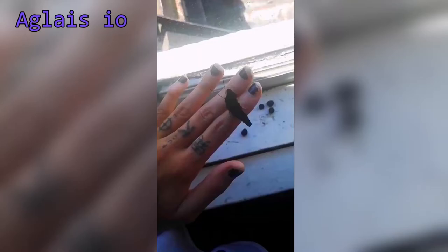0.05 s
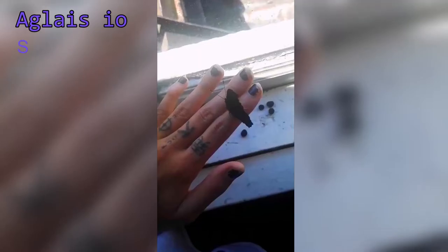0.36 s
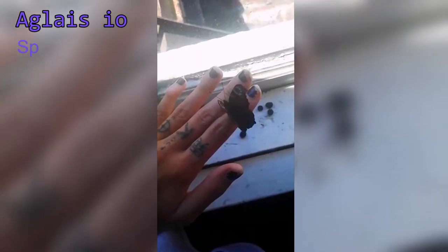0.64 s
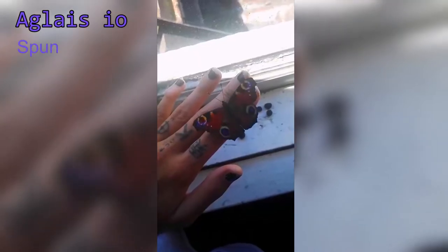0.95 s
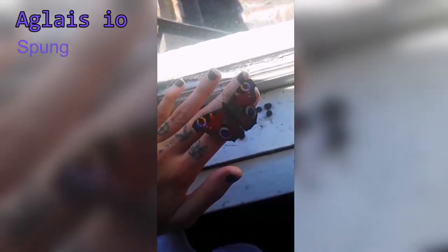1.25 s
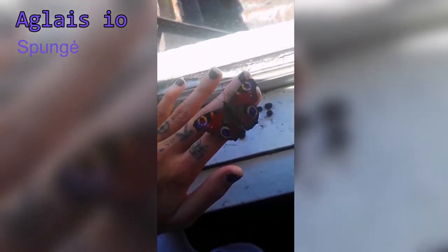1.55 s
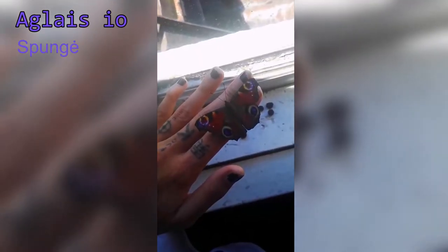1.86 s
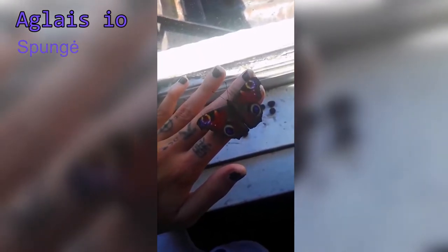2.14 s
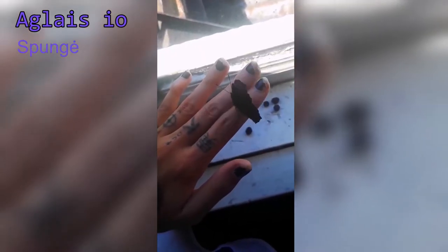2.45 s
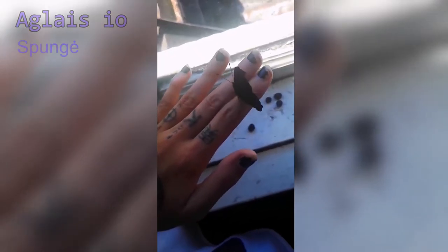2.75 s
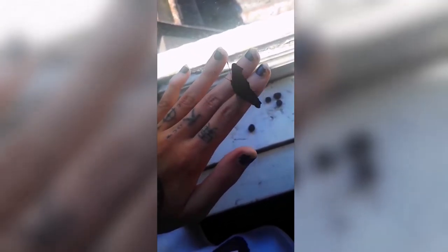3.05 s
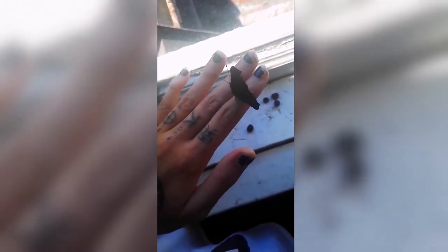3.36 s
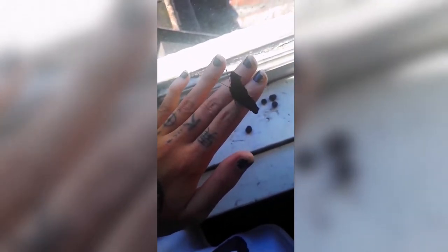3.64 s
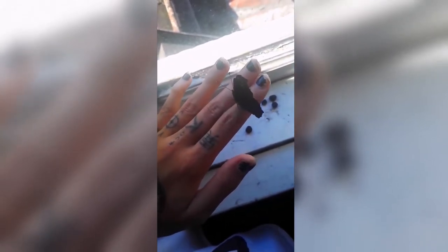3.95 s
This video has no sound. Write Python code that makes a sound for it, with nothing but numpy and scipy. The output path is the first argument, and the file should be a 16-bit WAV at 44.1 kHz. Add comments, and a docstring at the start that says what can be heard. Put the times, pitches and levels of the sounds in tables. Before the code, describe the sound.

Butterfly wings rustle faintly and close by in a quiet room. Steady hiss fades in by 0.5 seconds, with low rumble, faint electrical hum and a thin whine. Five tiny dry ticks fall between 0.5 and 1.7 seconds, and a soft high swish passes on the right around 1.8. A brief, louder rasp with a hollow ring comes at 3.4. Faint dull bumps occur near 0.9, 2.3 and 3.2 seconds.

```python
"""Tiny, dry rustles, perhaps the wings of a butterfly sitting on a hand, sound close by in a quiet room.
Each is stick-slip friction, a train of tiny catches: five high ticks, then one longer rasp with a
hollow, ringing body. A soft high swish passes on the right. Behind them the room fades in: even hiss,
brighter at the right microphone port, a low rumble, a faint mains hum, a thin whine and a few dull bumps."""
import sys
import numpy as np
from scipy import signal
from scipy.fft import rfft, irfft, next_fast_len
from scipy.io import wavfile
from scipy.ndimage import map_coordinates

SR = 44100
rng = np.random.default_rng(int(sys.argv[2]) if len(sys.argv) > 2 else 0)


def bounce(signal):
    """Save signal as a 16-bit WAV file at the path given by the first command-line argument."""
    frames = np.transpose(np.atleast_2d(signal))
    limited = np.clip(frames, -1, 1)
    pcm = np.round(limited * 32767).astype(np.int16)
    wavfile.write(sys.argv[1], SR, pcm)


N = 176400
TOP_HZ, NOISE_TOP_HZ = 15600, 14330  # upper band edges of the whole sound and of the steady noises

# Short rubs. Each row: centre in seconds, level in dB, half length in seconds,
# left minus right in dB, scuff relative to the level in dB.
WING_RUBS = [(0.452, -34.3, 0.0036, 6, -10), (0.669, -33.8, 0.0036, 4.5, -7.5),
             (0.884, -29.5, 0.0032, 2, -18), (1.316, -32.5, 0.0032, 4, -8), (1.712, -41, 0.006, 0, -5)]
# Snags within the rasp. Each row: centre in seconds, boost in dB.
RASP_SNAGS = [(3.380, 5.5), (3.3884, 6), (3.3965, 2.5), (3.407, 4.5), (3.416, 2)]
# Spectra of the rubs and the swish. Each row: frequency in Hz, relative spectral density in dB.
TICK_SPECTRUM = [(500, -40), (3000, -26), (7200, -20), (8200, -7.5), (9200, -10.5), (10300, -2.5),
                 (12200, 1), (13600, 4), (14300, -4), (15300, -28)]
SCUFF_SPECTRUM = [(500, -29), (3000, -10), (6500, -8), (8300, -1), (11000, -1), (14300, -18)]
RASP_SPECTRUM = [(400, -25), (2500, -17), (4200, -20), (5500, -22), (6300, -14.5), (6900, -11.5),
                 (10200, -5), (11200, 2), (13200, 4), (14150, 4), (14550, -37), (15500, -45)]
BODY_SPECTRUM = [(150, -22), (480, -13), (740, -1), (880, -4), (1040, 3), (1200, -4), (1500, 0), (1850, -7),
                 (2400, -7), (3000, -17), (4200, -10), (5500, -20), (7200, -5.5), (9500, -4), (12000, -26)]
SWISH_SPECTRUM = [(8500, -25), (10700, -7), (11500, -2), (12150, 0), (12700, -5), (13800, -15)]
# Spectra of the background. Each row: frequency in Hz, relative spectral density in dB.
HISS_SPECTRUM = [(30, -34), (300, 0), (900, 2.5), (1600, 0.5), (4000, 1), (7000, 0.5), (9500, 1),
                 (14300, 1.5)]
RUMBLE_SPECTRUM = [(110, -28), (180, 0.5), (240, 0), (285, -4), (340, -3), (420, -7), (700, -11.5),
                   (1500, -26), (4000, -40)]
BASS_SPECTRUM = [(10, -15), (30, 2), (50, -1.5), (70, 4), (88, -3), (125, -2), (165, -2), (230, -17.5),
                 (400, -45)]
LEFT_PORT_SPECTRUM = [(7000, -30), (9000, -12), (10500, -7.5), (11500, -4), (12700, 0), (13800, 3),
                      (14300, -13)]
RIGHT_PORT_SPECTRUM = [(7000, -37), (9300, -16), (10500, -6.5), (11500, 0.5), (12250, -1.5), (12800, -3),
                       (14300, -9)]
# Slow swells of the room noise. Each row: time in seconds, base level in dB.
HISS_ENVELOPE = [(.45, -45.5), (.66, -47), (.78, -44), (1.4, -44.5), (2.08, -44), (2.15, -42), (3.0, -42),
                 (4.0, -42)]
RUMBLE_ENVELOPE = [(.5, -52), (1.0, -50), (1.33, -49), (1.48, -51), (1.65, -49.5), (1.8, -51), (2.2, -46.8),
                   (2.45, -49.5), (2.8, -48.5), (2.98, -47.5), (3.1, -47), (3.45, -49.5), (3.73, -48.5),
                   (3.9, -48)]
BASS_ENVELOPE = [(.5, -52), (1.0, -50), (1.55, -52), (1.9, -50.5), (2.2, -46.8), (2.55, -48.5), (2.7, -52),
                 (2.9, -49.5), (3.2, -49), (4.0, -49)]
# Treble hiss at the ports. Each row: time in seconds, left and right base levels in dB.
PORT_ENVELOPES = [(.45, -51, -47.5), (.85, -48, -44.5), (1.2, -49, -46), (1.52, -48, -44), (1.7, -47, -45),
                  (1.98, -51, -46), (2.2, -48, -43.5), (2.5, -43.5, -40.5), (3.3, -48, -41.5),
                  (3.65, -47, -43.5), (4.0, -49, -43)]
# Hum partials. Each row: time in seconds, levels in dB at 1, 2 and 4 times the mains frequency.
HUM_ENVELOPES = [(.45, -55, -64, -61), (.75, -56, -60, -53), (1.25, -59, -67.5, -67),
                 (1.8, -54, -54.5, -69), (2.1, -52, -58.5, -55.5), (2.8, -60.5, -58, -66.5),
                 (3.0, -55, -48.5, -55), (3.25, -53, -57.5, -47.5), (3.45, -53, -54.5, -57.5),
                 (3.62, -65, -68, -50), (4.0, -50, -59, -68)]
# Steady tones of the whine. Each row: frequency in Hz, level in dB.
WHINE_TONES = [(12042, -61), (12511, -62), (13200, -67), (13523, -66), (13991, -58)]
# Low thuds. Each row: centre in seconds, frequency in Hz, level in dB, half length in seconds.
LOW_THUDS = [(.885, 62, -44, .015), (.98, 195, -44, .01), (2.27, 115, -47, .02), (3.18, 58, -43, .02)]


def friction(spectrum, slips_per_s=960, jitter=.45, scatter_db=2, decay_s=.00034, slip_share=.42):
    """Stick-slip friction: uneven slips each release a decaying burst of noise over a smooth scrape."""
    grit = rng.standard_normal((2, N))
    slip_times = np.cumsum(np.exp(jitter * rng.standard_normal(size=8000))) / slips_per_s
    sizes = amp(scatter_db * rng.standard_normal(size=8000))
    slips = np.bincount((slip_times * SR).astype(int), sizes, N)[:N]
    energy = signal.lfilter([1], [1, -np.exp(-1 / (decay_s * SR))], slips)
    power = 1 - slip_share + slip_share * energy / energy.mean()
    return coloured(grit * np.sqrt(power), spectrum)


def wing_ticks():
    """Friction lasting only milliseconds is heard as a tick: a crisp top over a duller scuff."""
    crisp, scuff = friction(TICK_SPECTRUM), friction(SCUFF_SPECTRUM)
    return sum(amp(db) * pan(side_db) * pulse(s, half, half, shape=1.05) * (crisp + amp(scuff_db) * scuff)
               for s, db, half, side_db, scuff_db in WING_RUBS)


def rasp(ring_hz=1499):
    """Friction with resonance: a bright rub snags while a hollow, ringing body builds and stops short."""
    snag_db = sum(db * pulse(s, .00051, .00051, shape=2.3) for s, db in RASP_SNAGS)
    rub = pulse(centre_s=3.396, rise_s=.024, fall_s=.024, shape=2.55)
    bright = amp(-24.3 + snag_db) * rub * friction(RASP_SPECTRUM)
    swell = pulse(centre_s=3.415, rise_s=.024, fall_s=.0055, shape=1.55)
    hollow = amp(-36.2) * pan(-4.5) * friction(BODY_SPECTRUM)
    ring = amp(-41) * pan(-5) * unit(np.sin(2 * np.pi * ring_hz * clock()))
    return bright + swell * (hollow + ring)


def swish():
    """High-band noise under a flat-topped envelope is heard as a light, even brushing."""
    envelope = pulse(centre_s=1.763, rise_s=.17, fall_s=.17, shape=6)
    return amp(-47.5) * pan(-10) * envelope * noise(SWISH_SPECTRUM)


def room_noise(hiss_trim_db=.5):
    """Incoherent noises add in power: hiss, rumble and bass, each swelling slowly."""
    hiss = amp(curves(HISS_ENVELOPE) + hiss_trim_db) * noise(HISS_SPECTRUM)
    rumble = amp(curves(RUMBLE_ENVELOPE) + .72 * wobble(6.7)) * noise(RUMBLE_SPECTRUM)
    bass = amp(curves(BASS_ENVELOPE) + 2 * wobble(8.96)) * noise(BASS_SPECTRUM)
    return hiss + rumble + bass


def port_hiss():
    """Spectral shaping gives each microphone port its own treble hiss; the level flickers slightly."""
    left = noise(LEFT_PORT_SPECTRUM, channels=1)
    right = noise(RIGHT_PORT_SPECTRUM, channels=1)
    return amp(curves(PORT_ENVELOPES) + .71 * wobble(16)) * np.vstack([left, right])


def mains_hum(mains_hz=50.1):
    """Harmonics of the mains frequency: three partials an octave apart swell and waver."""
    return sum(amp(db) * tone(mains_hz * 2 ** octave, waver=.9, per_s=16)
               for octave, db in enumerate(curves(HUM_ENVELOPES)))


def whine():
    """Narrow spectral lines in the top treble, probably from electronics, make a thin whine."""
    return sum(amp(db) * tone(hz, waver=.7, per_s=12) for hz, db in WHINE_TONES)


def bumps():
    """A low tone burst of a few cycles is heard as a dull thud; these probably come from handling."""
    return sum(amp(db) * pulse(s, half, half, shape=2) * tone(hz, waver=.3, per_s=20)
               for s, hz, db, half in LOW_THUDS)


def tone(hz, waver, per_s):
    """Random modulation of amplitude and phase broadens a line; each channel drifts alone, at rms 1."""
    def channel():
        phasor = np.exp(2j * np.pi * rng.random())
        drift = waver * (wobble(per_s) + 1j * wobble(per_s))
        return unit(np.real((phasor + drift) * np.exp(2j * np.pi * hz * clock())))
    return np.array([channel(), channel()])


def pulse(centre_s, rise_s, fall_s, shape):
    """A generalised Gaussian envelope: shape 1 is pointed, 2 bell-shaped, higher flat-topped."""
    t = clock() - centre_s
    return np.exp(-np.abs(t / np.where(t < 0, rise_s, fall_s)) ** shape / 2)


def noise(spectrum, channels=2):
    """Stationary coloured noise, uncorrelated between channels."""
    return coloured(rng.standard_normal((channels, N)), spectrum, NOISE_TOP_HZ)


def coloured(x, spectrum, top_hz=TOP_HZ):
    """Spectral shaping by (Hz, dB) points below a band edge, at rms 1."""
    points_hz, db = np.transpose(spectrum)
    def response(hz):
        return amp(np.interp(np.log(hz + 1), np.log(points_hz), db)) * (hz < top_hz)
    return unit(filtered(x, response))


def filtered(x, response):
    """Linear filtering multiplies the spectrum by a frequency response."""
    size = next_fast_len(N + 8192)
    return irfft(rfft(x, size) * response(np.fft.rfftfreq(size, 1 / SR)), size)[..., :N]


def wobble(per_s):
    """A smooth random curve: a spline through per_s knots a second."""
    return map_coordinates(rng.standard_normal(int(N * per_s / SR) + 4), [clock() * per_s])


def curves(rows):
    """Linear interpolation, at every sample, of each column after the time."""
    times, *columns = np.transpose(rows)
    return np.array([np.interp(clock(), times, column) for column in columns])


def pan(db):
    """Channel gains for a level difference, left minus right."""
    return amp(np.array([[db], [-db]]) / 2)


def amp(db):
    """Decibels to amplitude ratio."""
    return 10 ** (np.asarray(db) / 20)


def unit(x):
    """Normalisation to rms 1."""
    return x / np.sqrt(np.mean(x ** 2) + 1e-20)


def clock():
    """Time of every sample in seconds."""
    return np.arange(N) / SR


def scene():
    """Superposition: the close rustles add to the background of the room."""
    background = room_noise() + mains_hum() + port_hiss() + whine() + bumps()
    return wing_ticks() + swish() + rasp() + background


def record(dry):
    """A rising gain fades the sound in from silence, and a steep low-pass limits its bandwidth."""
    start_s, fade_s, edge_hz = .17, .34, 100
    fade = np.clip((clock() - start_s) / fade_s, 0, 1) ** 1.08
    return filtered(dry * fade, lambda hz: np.clip((TOP_HZ - hz) / edge_hz, 0, 1))


dry = scene()
out = record(dry)
bounce(out)
```